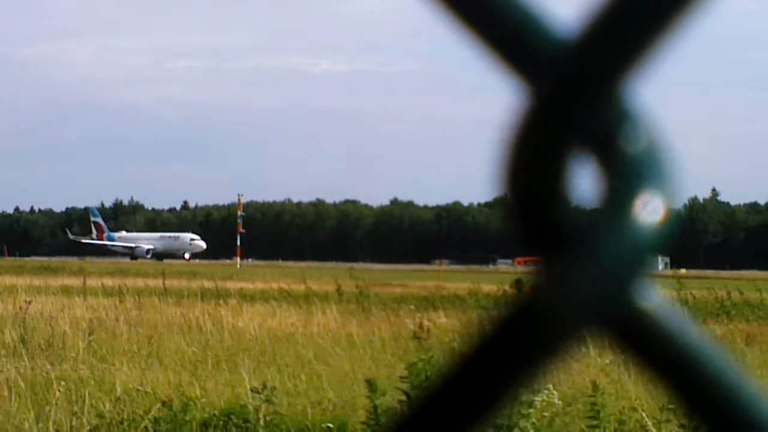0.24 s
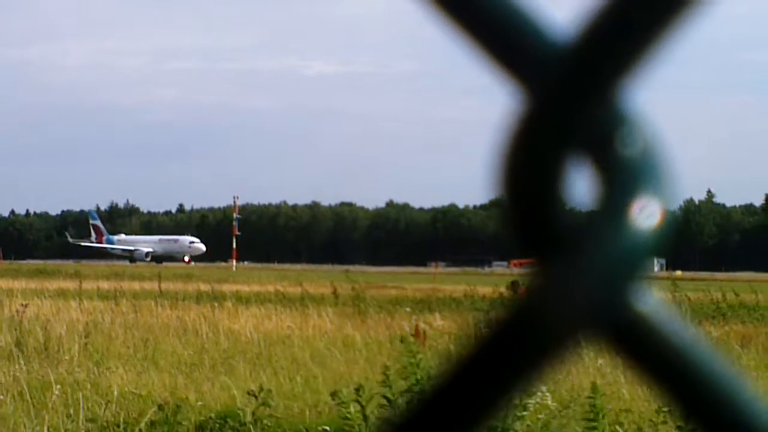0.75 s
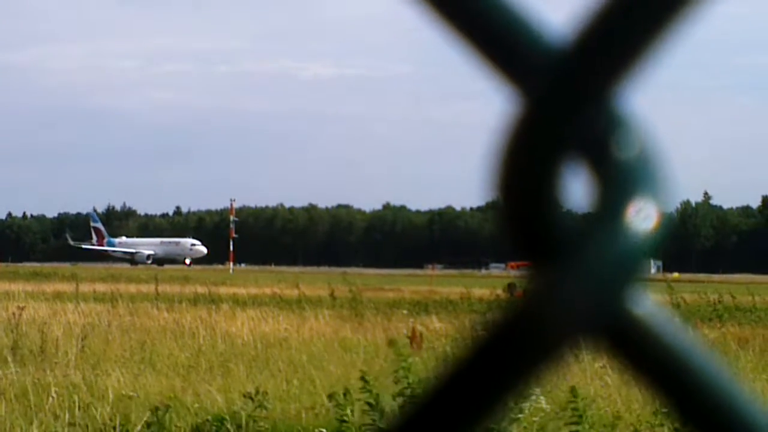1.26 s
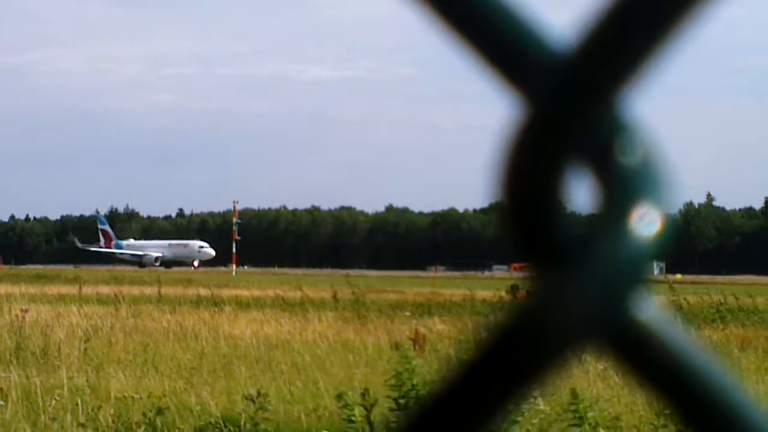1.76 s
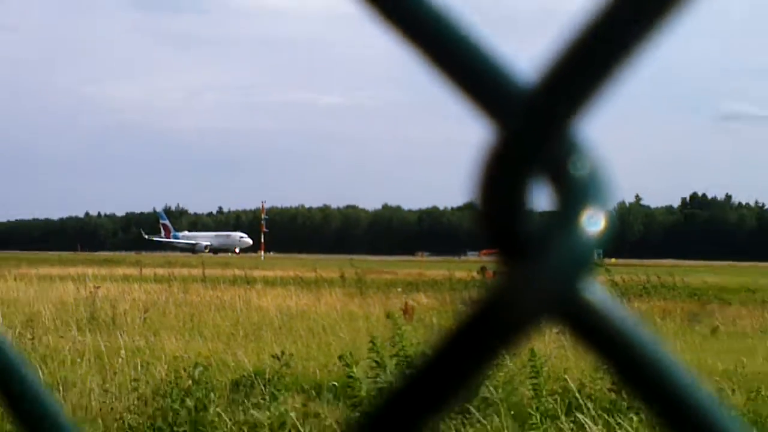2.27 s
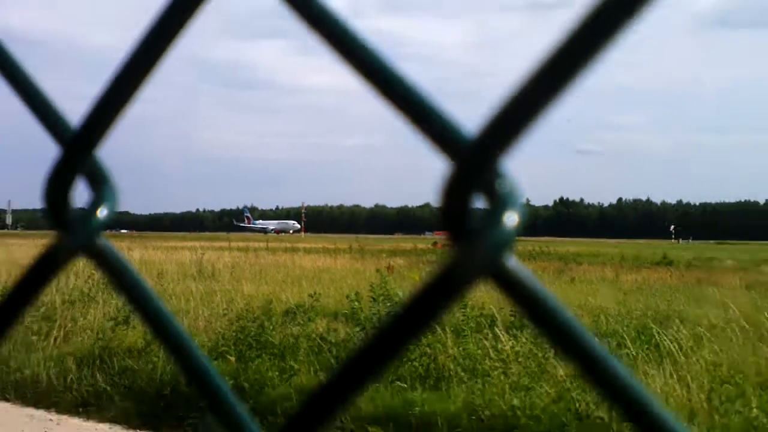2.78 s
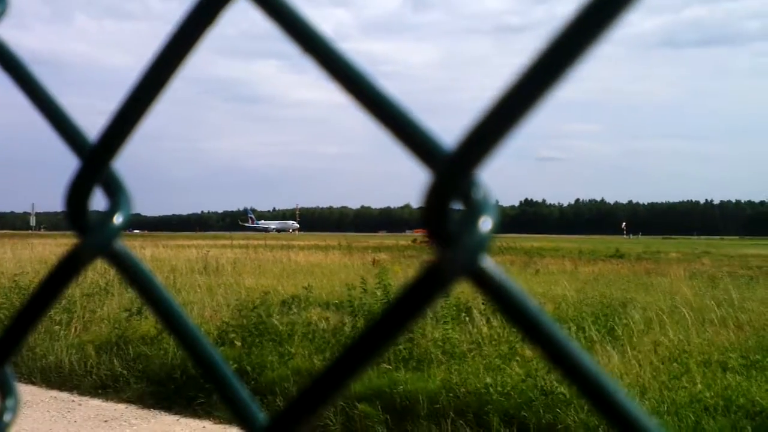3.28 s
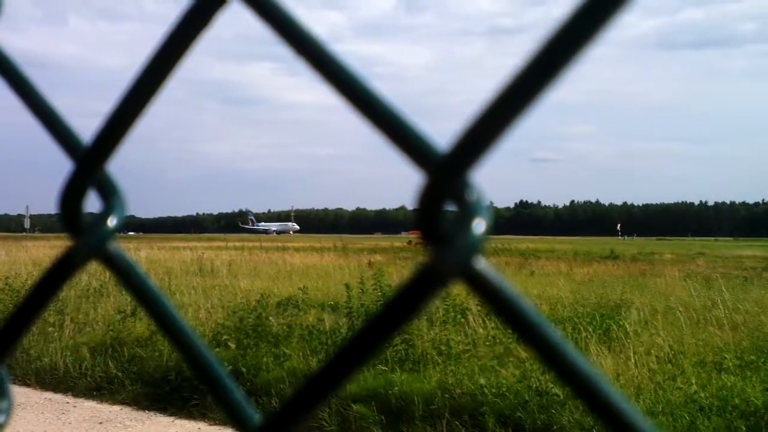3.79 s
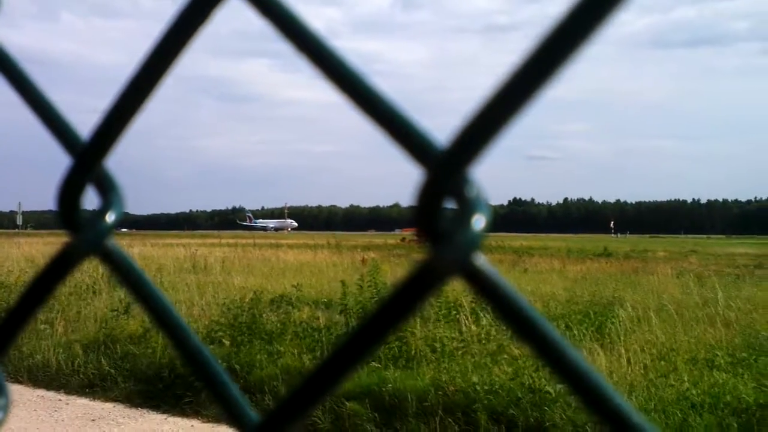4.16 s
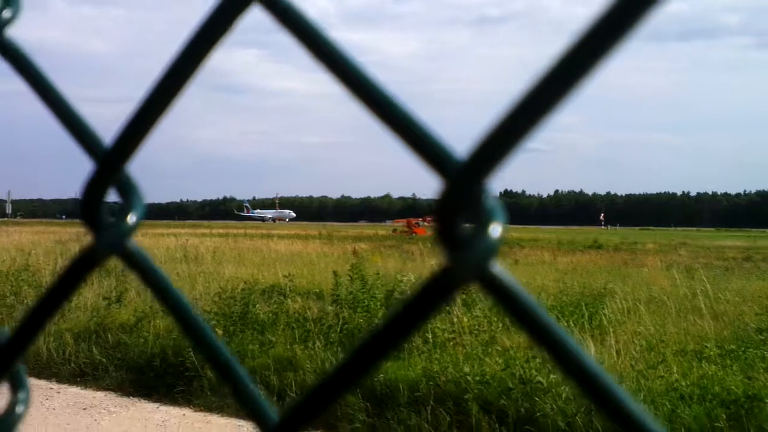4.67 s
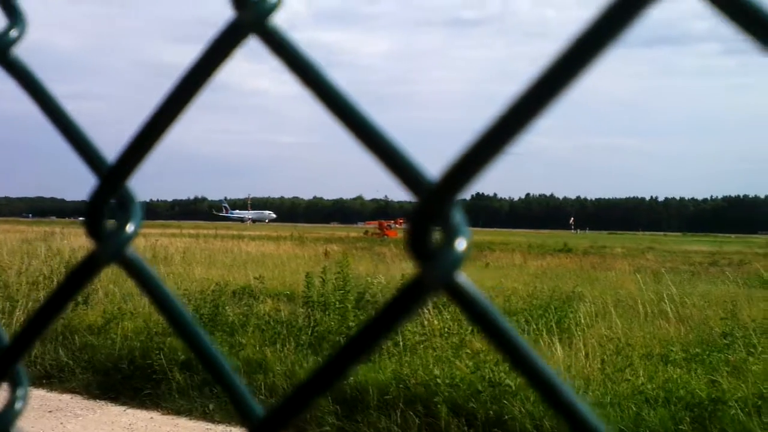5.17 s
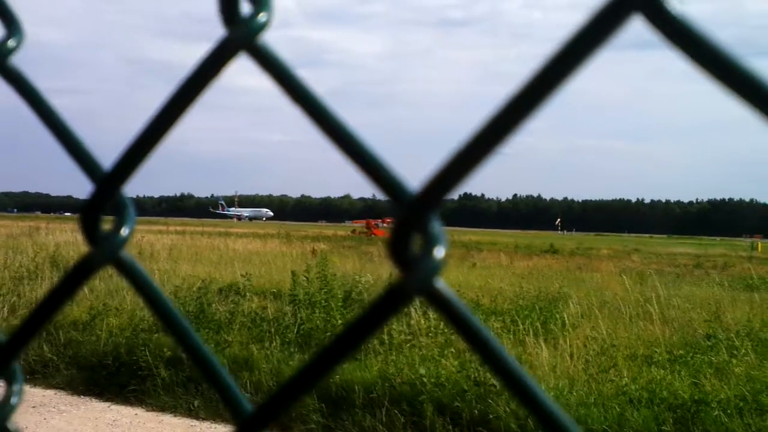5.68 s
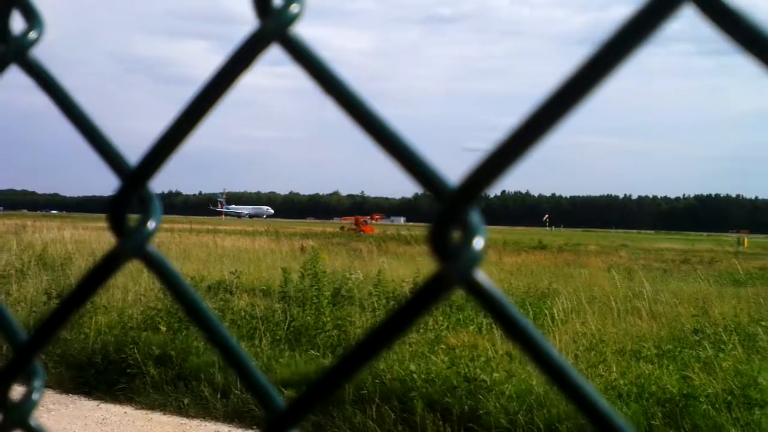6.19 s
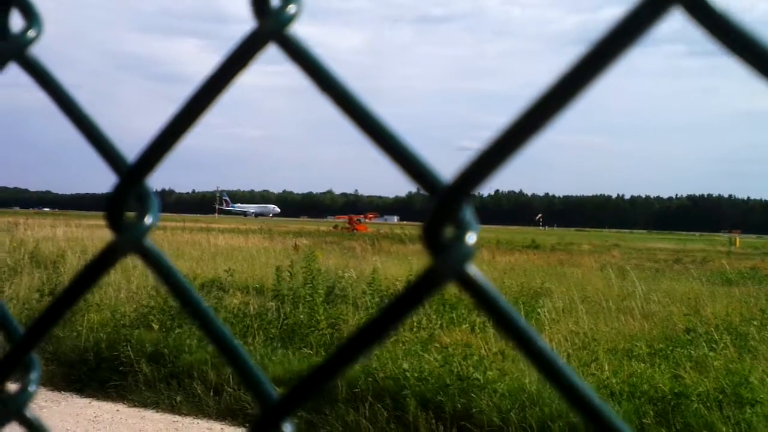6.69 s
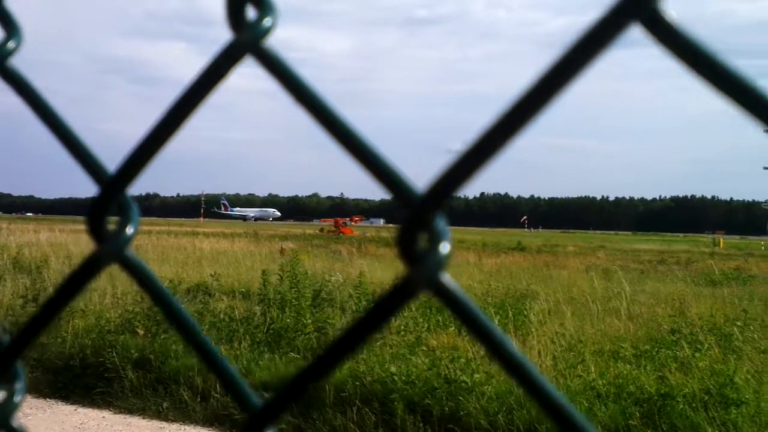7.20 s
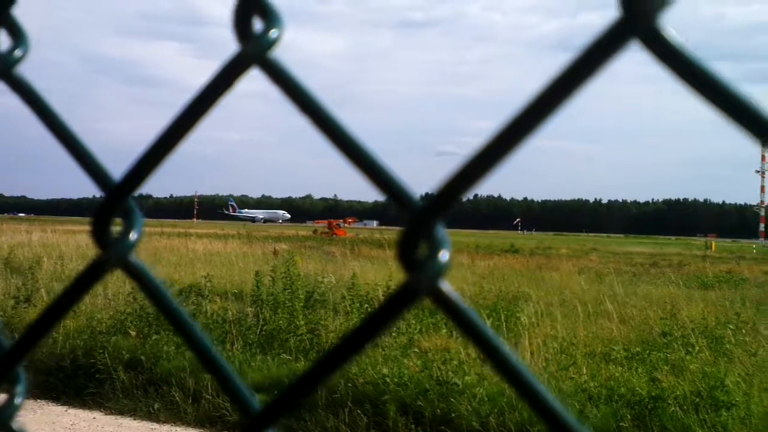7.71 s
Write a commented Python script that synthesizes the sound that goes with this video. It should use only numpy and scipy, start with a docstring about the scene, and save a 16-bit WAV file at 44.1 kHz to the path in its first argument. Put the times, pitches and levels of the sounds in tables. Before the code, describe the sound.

Far-off twin jet engines rise from quiet whine to full take-off thrust, buzzing and roaring, while wind bumps the microphone and an insect scratches softly.

```python
"""Across a broad meadow a distant twin-jet airliner spools up to take-off thrust, heard at two microphone ports.
Harmonics of the rising blade-passing rate sound over band-filtered jet noise; supersonic blade tips add a
buzz of shaft orders, and random gains and scattered paths stand for turbulent air. Wind knocks, mostly on
the right port, are short oscillating pulses with noisy wakes. A close bush-cricket starts after a few
seconds: noise strokes ring the resonances of its wing. Faint treble rustle and steady hiss lie beneath."""
import sys
import numpy as np
from scipy import signal
from scipy.fft import rfft, irfft, next_fast_len
from scipy.io import wavfile
from scipy.ndimage import uniform_filter1d, minimum_filter1d

SR = 44100
rng = np.random.default_rng(int(sys.argv[2]) if len(sys.argv) > 2 else 0)


def digitize_waveform(pressure):
    """Quantize a signal to 16-bit integers and store it at the path in sys.argv[1].

    Rows of a 2-D input are taken as channels; values are limited to [-1, 1].
    """
    field = np.atleast_2d(pressure).T
    bounded = np.clip(field, -1, 1)
    quanta = np.round(bounded * 32767).astype(np.int16)
    wavfile.write(sys.argv[1], SR, quanta)


N = 350532
T = np.arange(N) / SR
HZ = np.fft.rfftfreq(next_fast_len(N), 1 / SR) + 1e-3  # filter axis, kept off zero

# Levels are nominal source levels, ahead of random fluctuation, panning and the bass cut.
# Fan speed as heard: (time [s], mean blade-passing rate of the two fans [Hz])
FAN_SPEED = [(0, 1030), (.4, 1150), (.8, 1300), (1.06, 1445), (1.33, 1550), (1.6, 1578), (1.85, 1590),
             (2.4, 1585), (2.65, 1625), (2.92, 1718), (3.18, 1848), (3.45, 2017), (3.98, 2315),
             (4.24, 2433), (4.5, 2538), (4.77, 2626), (5.04, 2667), (5.3, 2689), (5.83, 2706), (7.42, 2731),
             (7.95, 2732)]
# Blade tone level, swelling and fading, with late dips like slow beats: (time [s], level [dB])
BLADE_TONE_LEVEL = [(0.05, -52.5), (0.4, -57.5), (0.61, -50.5), (0.66, -56.0), (1.2, -40.0), (1.5, -41.0),
                    (1.63, -47.0), (1.69, -39.0), (1.73, -43.0), (1.85, -34.0), (1.9, -44.0), (2.08, -37.0),
                    (2.14, -42.0), (2.32, -38.0), (2.38, -47.0), (2.44, -38.0), (2.54, -46.5),
                    (2.63, -37.5), (2.71, -48.0), (3.0, -47.5), (3.47, -42.0), (3.6, -30.5), (4.01, -30.5),
                    (4.14, -23.5), (4.36, -22.5), (4.46, -26.5), (4.52, -20.0), (4.6, -24.0), (4.69, -15.5),
                    (4.8, -16.5), (5.03, -22.0), (5.07, -14.0), (5.15, -16.5), (5.19, -22.0), (5.24, -14.5),
                    (5.32, -21.0), (5.46, -14.0), (5.52, -24.0), (5.6, -16.5), (5.63, -22.0), (5.71, -17.5),
                    (5.77, -23.0), (5.79, -18.5), (5.85, -21.5), (5.88, -15.5), (5.93, -22.5),
                    (6.05, -27.5), (6.29, -21.5), (6.33, -26.0), (6.37, -17.0), (6.42, -22.0), (6.5, -13.5),
                    (6.54, -21.5), (6.56, -19.5), (6.6, -27.5), (6.62, -18.5), (6.64, -16.5), (6.68, -24.5),
                    (6.81, -28.0), (6.85, -21.5), (6.88, -25.5), (6.99, -20.0), (7.02, -27.0),
                    (7.05, -32.0), (7.09, -22.5), (7.19, -22.0), (7.22, -28.0), (7.27, -20.0), (7.3, -29.5),
                    (7.34, -20.5), (7.36, -27.5), (7.4, -22.5), (7.48, -30.0), (7.56, -23.5), (7.64, -26.0),
                    (7.7, -20.5), (7.75, -28.0), (7.84, -24.0), (7.9, -32.5), (7.95, -26.0)]
# Second blade harmonic: (time [s], level against the roar [dB])
SECOND_HARMONIC = [(0, -13), (.35, -11), (.7, -11), (.82, -2.5), (1.0, -5.5), (1.3, -3), (1.5, 1.5),
                   (1.65, -3), (1.85, -0.5), (1.97, -1), (2.1, 0.5), (2.25, 7.5), (2.35, -5), (2.43, 4),
                   (2.52, -4), (2.6, 1.5), (2.75, -6), (3.05, -6), (3.2, 1), (3.35, -10), (3.64, 0.5),
                   (4.0, -12), (4.3, -15), (4.75, -23.5), (5.0, -24), (5.6, -29), (7.95, -27.5)]
# Third blade harmonic, lost in the air as it climbs: (blade-passing rate [Hz], level [dB])
THIRD_HARMONIC = [(1030, -52), (1300, -54.5), (1600, -56), (1750, -56), (2150, -52), (2430, -61),
                  (2550, -79)]
# Buzz-saw shocks at the blade tips: (shaft order [-], level against the roar [dB])
BUZZ_ORDERS = [(9, -32), (11, -31.5), (12, -32), (14, -22), (15, -22), (16, -20.5), (17, -20), (18, -35),
               (20, -17), (21, -24.5), (22, -20), (23, -27), (27, -27.5), (28, -20.5), (29, -29),
               (30, -19.5), (31, -26.5), (32, -23.5), (33, -21.5), (34, -23.5), (35, -25.5), (37, -16.5),
               (39, -21), (40, -20.5), (41, -16), (42, -22), (44, -22), (45, -32.5), (47, -21)]
# Strength added to all the buzz-saw orders above: (time [s], level [dB])
BUZZ_STRENGTH = [(4, -5.5), (4.5, -3), (5.4, -1.5), (7.2, 3), (7.95, 3)]
# Higher of the two shaft orders that stand out of the buzz: (time [s], level [dB])
UPPER_ORDER_LEVEL = [(4.35, -41), (4.46, -55), (4.56, -34), (4.95, -43.5), (5.22, -32), (5.4, -50),
                     (5.52, -37), (5.75, -47), (6.07, -37), (6.69, -28.5), (6.8, -41), (7.03, -33.5),
                     (7.18, -48), (7.28, -27), (7.5, -33), (7.76, -42), (7.9, -32)]
# Lower of these two shaft orders: (time [s], level [dB])
LOWER_ORDER_LEVEL = [(4.35, -48), (4.47, -51), (4.89, -34.5), (5.95, -34), (6.04, -35), (6.15, -24),
                     (6.31, -43), (6.51, -33), (7.01, -42), (7.49, -35), (7.71, -49), (7.9, -41)]
# Compressor stages on the fan shaft, before air absorption:
# (blade count over the fan's [-], level against the roar [dB])
COMPRESSOR_STAGES = [(3.55, -22), (3.88, -21)]
# Jet roar: (time [s], level [dB])
ROAR_LEVEL = [(0, -47), (.6, -45), (1.1, -42), (1.5, -41.5), (2.25, -39.5), (2.9, -39.5), (3.3, -35),
              (3.8, -29), (4.25, -24), (4.7, -19.5), (5.0, -19), (5.15, -18), (5.35, -17), (5.47, -19),
              (5.6, -18.5), (5.9, -20.5), (6.15, -18.5), (6.35, -19), (6.5, -16), (6.6, -19.5), (6.68, -18),
              (6.77, -21.5), (6.86, -19), (6.94, -24), (6.99, -20), (7.05, -25), (7.15, -24), (7.5, -23),
              (7.68, -22.5), (7.78, -25), (7.95, -23)]
# Relative roar spectrum, with the ground-bounce dip near 1.9 kHz:
# (frequency [Hz], density at idle [dB per Hz], density at full thrust [dB per Hz])
ROAR_SPECTRUM = [(100, 5, -27.5), (272, -19, -41.5), (516, -9.5, -26), (692, -8, -21), (1300, -5.5, -13.5),
                 (1683, -9, -13), (1990, -10, -17.5), (2426, -8, -8.5), (3030, -2.5, -6), (3640, -5.5, -9),
                 (4690, -12, -20), (6566, -20, -31), (8230, -42, -52.5), (12000, -46, -57)]
# Roar colour as the jet rolls: (time [s], treble above 3 kHz [dB], rumble towards the bass [dB])
ROAR_TILT = [(0, -3.5, 1), (1.1, 2, 0.5), (2.2, 0, -4.5), (2.8, 0.5, 0), (3.7, 5, -1), (4.3, 1, -2.5),
             (5.2, 0.5, -3), (5.8, -2, 3), (6.5, 0, 0), (7.1, 0, 6.5), (7.95, -1.5, 7.5)]
# Roar at the two ports: (frequency [Hz], likeness [0-1], left minus right [dB])
PORT_LIKENESS = [(100, 0.07, -2.5), (250, 0.92, 1), (820, 0.76, 1.5), (1700, 0.06, 2), (3140, 0.36, -1),
                 (4300, .45, -3), (6000, 0.22, -7.5), (9700, 0.1, 5.5)]
# Balance of the whole jet: (time [s], left minus right [dB])
JET_BALANCE = [(0, -2), (1.8, -3), (3.4, -3), (7.95, -.5)]
# Wind knocks: (time of the peak [s], peak level [dB], pitch [Hz], length at half height [ms])
WIND_KNOCKS = [(0.193, -38, 580.0, 2.2), (0.198, -22.5, 467, 1.5), (0.213, -27, 490.0, 1.3),
               (0.49, -37.0, 470.0, 2.5), (0.849, -29.5, 480.0, 4.9), (0.95, -40, 500.0, 5.3),
               (1.023, -37, 530.0, 2.6), (1.042, -29, 480.0, 2.8), (1.048, -37, 530.0, 1.9),
               (1.055, -29, 520.0, 2.1), (1.06, -27, 643, 2.5), (1.072, -36, 520.0, 2.9),
               (1.115, -29, 430.0, 2.6), (1.118, -23, 390.0, 2.5), (1.129, -22.5, 440.0, 2.8),
               (1.141, -33, 440.0, 2.2), (1.163, -32, 416, 3.6), (1.267, -31, 490, 1.7),
               (1.355, -24.5, 555, 2.5), (1.486, -30.5, 470.0, 2), (1.513, -21.5, 460, 3.5),
               (1.524, -31, 490.0, 1.9), (1.531, -24, 570.0, 1.7), (1.564, -19, 520.0, 1.9),
               (1.569, -18.5, 425, 3.9), (1.574, -12.5, 435, 0.88), (1.58, -27, 330.0, 1.8),
               (1.634, -31, 420.0, 3.2), (1.65, -28, 390.0, 2.4), (1.662, -21.5, 393, 2.1),
               (1.717, -33.0, 560.0, 1.7), (1.732, -28.5, 520.0, 2.8), (1.739, -37, 460.0, 2.1),
               (1.774, -31, 540.0, 2.3), (1.8, -37, 474, 7.1), (1.913, -34, 560.0, 2.1),
               (2.309, -37, 580.0, 2), (2.481, -31, 440.0, 2.4), (2.516, -22, 566, 2.8),
               (2.52, -27, 420.0, 1.7), (2.53, -29, 470.0, 2), (2.549, -35.0, 440.0, 2.8),
               (2.554, -21, 534, 3.4), (2.606, -27, 474, 2.8), (2.802, -39, 400, 2.8),
               (2.813, -36, 487, 1.7), (2.929, -39.0, 450, 2), (2.973, -37.0, 450, 2),
               (3.171, -36, 550.0, 3), (3.355, -36, 490.0, 2.3), (5.241, -19, 390, 2.4),
               (5.32, -20, 710.0, 1.8), (5.49, -18, 510.0, 3), (5.591, -20, 464, 5.2),
               (5.629, -19, 550.0, 2.2), (5.638, -18, 610.0, 2.3), (5.872, -16.5, 535, 2.5),
               (5.902, -15.5, 520, 2.6), (5.908, -13, 510, 3.1), (5.916, -15, 570.0, 2.2),
               (6.211, -19, 640, 2.0), (6.216, -20, 543, 3.6), (6.234, -14, 600, 3.7),
               (6.239, -9, 660, 2.7), (6.322, -17, 545, 2.5), (6.331, -21, 430, 3.9),
               (6.365, -15.5, 490, 2.4), (6.374, -20, 480.0, 2.1), (6.78, -20, 398, 2.1),
               (7.04, -24, 400, 2.7)]
# Wind buffeting between the knocks: (time [s], median level [dB])
BUFFETING = [(0, -85), (.38, -60), (.55, -68), (.95, -57), (1.2, -57), (1.38, -63.5), (1.72, -55.5),
             (2.0, -70), (2.3, -70), (2.9, -69), (3.5, -68), (4.7, -70.5), (5.6, -57), (6.0, -63.5),
             (7.0, -57), (7.4, -74), (7.95, -70)]
# Bush-cricket wing: (time [s], cycles so far [-])
WING_CYCLES = [(2.757, 0), (3.124, 8), (3.877, 24), (5.359, 56), (5.732, 64), (6.113, 72), (7.14, 94),
               (7.608, 104), (7.895, 110)]
# Bush-cricket: (time [s], level [dB], left minus right [dB], blur of the strokes [0-1])
CRICKET_LEVEL = [(2.74, -54, 2, 0.1), (2.82, -49.5, 0.5, 0.23), (3.4, -55.5, 2, 0.4), (3.6, -60, -2, 0.7),
                 (4.2, -53.5, -2, 0.4), (4.9, -54.5, -2, 0.46), (5.1, -55, -0.5, 0.5), (5.4, -53.5, 1, 0.7),
                 (5.55, -58.5, 0.5, 0.5), (5.75, -60.5, 3, 0.6), (6.25, -61.5, 2, 0.8), (6.5, -50, 0, 0.36),
                 (6.9, -60, 4, 0.58), (7.25, -46, 1, 0.26), (7.7, -53.5, 1, 0.44), (7.95, -66, 1, 0.5)]
# Resonances of the wing: (frequency [Hz], width [Hz], level [dB])
WING_MODES = [(9460, 500, -4), (10030, 720, 3.5), (10600, 800, -3), (11270, 430, -6.5), (12200, 500, -10),
              (13000, 1200, -19), (14900, 900, -28)]
# Extra level of the wing resonance near 11.3 kHz: (time [s], level [dB])
UPPER_WING_LEVEL = [(2.7, 6), (3.6, 6.5), (4.2, 1), (5.2, 2), (6, -1.5), (7.95, -1)]
# Faint rustle in the treble: (time [s], level [dB])
RUSTLE_LEVEL = [(0, -83), (.9, -75), (1.25, -67), (1.55, -72), (1.7, -76), (7.95, -80)]

BLADES = 36
IDLE_HZ, FULL_HZ = 1030, 2430  # blade rates at idle and at full thrust
SONIC_HZ, SONIC_SPAN_HZ = 2260, 140  # blade rate where the tips turn supersonic; span of the buzz's onset
LOUD_ORDERS = 24, 19  # shaft orders that stand out of the buzz
# The two engines spool up apart and draw together between these times.
MATCH_S, MATCHED_S = 4.2, 5.5
GAP_HZ, MATCHED_GAP_HZ = 31, 6  # gap between their blade rates
STEADY_APART, STEADY_MATCHED = 0.19, 0.83  # unscattered share of power in the fundamental
# Far engine's blade tone against the near one: about equal at first, much weaker once matched.
FAR_APART_DB, FAR_MATCHED_DB = 0.5, -13.5
HUMP_DB, HUMP_MATCHED_DB = -6, -11  # broad hump round each harmonic, against the near tone
AIR_HZ = 6500  # above this the long path through air absorbs the compressor tones
EDDY_DB = 0.65  # large eddies shake tones and roar together

KNOCK_PAN_DB, KNOCK_PAN_SCATTER_DB = -14.5, 6  # left minus right: the right port faces the wind
KNOCK_RISE = 0.86  # rise time over fall time
KNOCK_SAG = 0.71  # share by which the pitch falls over the knock's length
THUD_DB, THUD_MS = -6, 1.95  # dull push and pull of air under a knock of -25.5 dB
THUD_SLOPE = -0.35  # change of the thud's relative level per dB of knock level
KNOCK_TAIL, KNOCK_TAIL_S = 0.26, 0.0086  # wake's share of the peak, and decay time
CRACK_DB, CRACK_MS = -11, 1.5  # sharp crackle on the front of each knock
ECHO_HZ = 11900  # the cricket's echoes lose the top of the scrape
WING_WANDER_DB, WING_TURN = 2.0, 1.8  # each mode's own swell; spread of its phase at the right port [rad]
HISS_DB = -62.5
BASS_CUT_HZ, BASS_LEAK_DB, TOP_HZ = 257, -40, 15700


def undb(db):
    """Level: 20 dB is a tenfold amplitude."""
    return 10 ** (np.asarray(db) / 20)


def curves(table):
    """Linear interpolation: columns of a time table, one value a sample."""
    s, *columns = np.transpose(table)
    return [np.interp(T, s, c) for c in columns]


def at_hz(table, hz):
    """Logarithmic pitch: columns of a frequency table, straight on a log axis."""
    f, *columns = np.transpose(table)
    return [np.interp(np.log(hz), np.log(f), c) for c in columns]


def shaped(x, gain):
    """Linear filtering: multiply the spectrum by a gain given on HZ."""
    return irfft(rfft(x, next_fast_len(N)) * gain, next_fast_len(N))[..., :N]


def unit(x):
    """Normalization to unit root-mean-square amplitude."""
    return x / np.sqrt(np.mean(np.abs(x) ** 2))


def walk(rate):
    """Random modulation: levels held 1 / rate s and smoothed twice, with unit spread."""
    k = int(SR / rate)
    held = np.repeat(rng.standard_normal(N // k + 1), k)
    return unit(uniform_filter1d(uniform_filter1d(held, k), k)[:N])


def pair(a, b, alike):
    """Coherence: left and right from two unrelated signals with the given likeness."""
    alike = np.clip(alike, 0, 1)
    return np.sqrt((1 + alike) / 2) * a + np.sqrt((1 - alike) / 2) * b * np.array([[1], [-1]])


def panned(x, pan_db):
    """Level difference: half added at the left, half taken at the right."""
    return x * undb(np.outer([1, -1], pan_db) / 2)


def bell(ms_from_peak, length_ms):
    """Gaussian envelope of the given length at half height."""
    return np.exp(-np.log(16) * (ms_from_peak / length_ms) ** 2)


def band_noise(noise, order, low_hz, high_hz):
    """Band-pass filtering: noise between two corners, at unit amplitude."""
    sos = signal.butter(order, [low_hz, high_hz], "band", fs=SR, output="sos")
    return unit(signal.sosfilt(sos, noise))


def tone(turns, steady, rate, alike):
    """Multipath fading: a sine on one straight path and many scattered ones fades and wavers."""
    steady = np.clip(steady, 0, 1)
    common, own = (walk(rate) + 1j * walk(rate) for _ in range(2))
    paths = np.sqrt(steady) + np.sqrt((1 - steady) / 2) * pair(common, own, alike)
    return np.sqrt(2) * np.real(paths * np.exp(2j * np.pi * turns))


def as_engines_match(apart, matched):
    """Synchronization: a value that glides while the two engines draw together."""
    return np.interp(T, [MATCH_S, MATCHED_S], [apart, matched])


def blade_tones(hz, shafts, roar_db):
    """Blade passing and beating: two nearly equal fans sound harmonics, each in a turbulence hump."""
    steady = as_engines_match(STEADY_APART, STEADY_MATCHED)
    far_db = as_engines_match(FAR_APART_DB, FAR_MATCHED_DB)
    hump_db = as_engines_match(HUMP_DB, HUMP_MATCHED_DB)
    third_db, = at_hz(THIRD_HARMONIC, hz)
    levels = [curves(BLADE_TONE_LEVEL)[0], roar_db + curves(SECOND_HARMONIC)[0], third_db]
    total_amplitude = np.sqrt(1 + undb(2 * far_db) + undb(2 * hump_db))
    out = 0
    for harmonic, db in enumerate(levels, start=1):
        order = harmonic * BLADES
        near, far = (tone(order * shaft, steady=steady / harmonic, rate=60 * harmonic, alike=0.46)
                     for shaft in shafts)
        # turbulence swallowed by the fan broadens the line
        hump = tone(order * shafts[0], steady=0, rate=350, alike=0.49)
        mixture = near + undb(far_db) * far + undb(hump_db) * hump
        out = out + undb(db + 1.73 * walk(45)) * mixture / total_amplitude
    return out


def shaft_buzz(hz, shaft, roar_db):
    """Shock radiation: supersonic blade tips sound multiples of the shaft rate."""
    sonic = np.clip((hz - SONIC_HZ) / SONIC_SPAN_HZ, 0, 1)
    buzz = sum(undb(db + 2.0 * walk(6)) * tone(order * shaft, steady=0.13, rate=26, alike=0.32)
               for order, db in BUZZ_ORDERS)
    out = undb(roar_db + curves(BUZZ_STRENGTH)[0]) * buzz
    for order, level in zip(LOUD_ORDERS, (UPPER_ORDER_LEVEL, LOWER_ORDER_LEVEL)):
        out = out + undb(curves(level)[0]) * tone(order * shaft, steady=0.68, rate=25, alike=0.22)
    return sonic * out


def compressor(shaft, roar_db):
    """Blade passing with air absorption: stage tones keep their ratio to the fan and lose their top."""
    stages = sum(undb(db) * tone(ratio * BLADES * shaft, steady=.02, rate=140, alike=0.65)
                 for ratio, db in COMPRESSOR_STAGES)
    return shaped(undb(roar_db + 1.5 * walk(12)) * stages, 1 / (1 + (HZ / AIR_HZ) ** 16))


def roar(thrust, level_db, treble_db, rumble_db):
    """Turbulent mixing noise: quarter-octave bands twinkle in moving air, together and alone."""
    noise = rfft(rng.standard_normal((2, next_fast_len(N))))
    out, power = 0, 0
    shared, patch = walk(30) + 0.13 * walk(13.0), walk(17)
    for hz in 90 * 2 ** (np.arange(29) / 4):
        skirt = np.cos(np.pi / 2 * np.clip(4 * np.log2(HZ / hz), -1, 1)) ** 2
        band = irfft(noise * skirt, next_fast_len(N))[:, :N]
        idle_db, full_db = at_hz(ROAR_SPECTRUM, hz)
        alike, pan_db = at_hz(PORT_LIKENESS, hz)
        patch = 0.866 * patch + 0.32 * walk(16)  # neighbouring bands pass through the same eddies
        treble_share = np.clip(np.log2(hz / 3000), 0, 1)
        rumble_share = np.clip(np.log2(1300 / hz), 0, 1)
        tilt_db = treble_db * treble_share + rumble_db * rumble_share
        gain = undb(idle_db + thrust * (full_db - idle_db) + tilt_db)
        power = power + gain ** 2 * hz  # bandwidth grows with frequency
        twinkle = undb(0.7 * shared + 0.6 * patch + 0.74 * walk(25))
        out = out + gain * twinkle * panned(pair(*band, alike), pan_db)
    return unit(out / np.sqrt(power)) * undb(level_db)


def jet():
    """Superposition: fan, shock, compressor and roar add, and large eddies shake them together."""
    roar_db, = curves(ROAR_LEVEL)
    hz = uniform_filter1d(curves(FAN_SPEED)[0], SR // 5)
    gap = as_engines_match(GAP_HZ, MATCHED_GAP_HZ)
    shafts = [np.cumsum(hz + side * gap / 2) / BLADES / SR for side in (-1, 1)]  # turns: near, far
    thrust = np.clip((hz - IDLE_HZ) / (FULL_HZ - IDLE_HZ), 0, 1)
    tones = blade_tones(hz, shafts, roar_db) + shaft_buzz(hz, shafts[0], roar_db)
    tones = tones + compressor(shafts[0], roar_db)
    engines = tones + roar(thrust, roar_db, *curves(ROAR_TILT))
    return panned(engines, *curves(JET_BALANCE)) * undb(EDDY_DB * walk(28))


def wind_knocks():
    """Aerodynamic pressure pulses: eddies strike the ports as falling blips with a ragged wake."""
    out, t = np.zeros((2, N)), np.arange(-512, 2048) / SR
    draws = rng.standard_normal((len(WIND_KNOCKS), 2, len(t)))
    for (s, db, hz, ms), noise in zip(WIND_KNOCKS, draws):
        t_ms = 1000 * t
        envelope = bell(t_ms / np.where(t < 0, KNOCK_RISE, 1), ms)
        turns = hz * t * (1 - KNOCK_SAG * t_ms / (2 * ms))
        blip = envelope * np.cos(2 * np.pi * turns + np.pi * noise[1, 0])
        thud = np.sign(noise[1, 1]) * 4 * t_ms / THUD_MS * bell(t_ms, THUD_MS)
        thud = undb(THUD_DB + THUD_SLOPE * (db + 25.5)) * thud
        crack = band_noise(noise[0], 2, 1.2 * hz, 2.43 * hz)
        crack = undb(CRACK_DB) * bell(t_ms + 0.41 * ms, CRACK_MS) * crack
        wake = pair(*band_noise(noise, 3, .5 * hz, 1.33 * hz), 0.8)
        wake = KNOCK_TAIL * np.clip(t / 0.0026, 0, 1) * np.exp(-np.abs(t) / KNOCK_TAIL_S) * wake
        left_db = KNOCK_PAN_DB + KNOCK_PAN_SCATTER_DB * noise[0, 0]
        i = int(s * SR) - 512
        out[:, i:i + len(t)] += undb(db) * undb([[left_db], [0]]) * (blip + thud + crack + wake)
    return out


def wind_patter():
    """Intermittent turbulence: low-passed noise in bounded random bursts buffets the ports."""
    # tanh keeps the small eddies from growing into knocks
    eddies = rng.standard_normal((2, N)) * undb(10.1 * np.tanh(0.76 * walk(70)))
    patter = shaped(pair(*eddies, 0.69), 1 / np.sqrt(1 + (HZ / 520) ** 6))
    return panned(patter / np.median(np.abs(patter)), -3.0) * undb(curves(BUFFETING)[0])


def cricket():
    """Stridulation and resonance: a sharp then a longer scrape each cycle rings the wing, over echoes."""
    level_db, pan_db, blur = curves(CRICKET_LEVEL)
    s, count = np.transpose(WING_CYCLES)
    cycle = np.interp(T, s, count, left=-1) + .25  # negative before the song starts
    which, phase = np.maximum(cycle, 0).astype(int), cycle % 1
    size = undb(2.2 * rng.standard_normal((int(count[-1]) + 2, 2)))[which].T
    sharp = size[0] * np.exp(-((phase - .25) / 0.042) ** 2)
    long = 0.64 * size[1] * np.exp(-((phase - .59) / 0.099) ** 2)
    noise = pair(*rng.standard_normal((2, N)), 0.28) * (cycle >= 0)
    echoes = shaped(noise * blur * undb(4.5 * walk(7.5)), 1 / (1 + (HZ / ECHO_HZ) ** 8))
    source = noise * (sharp + long) + echoes
    scrape = 0
    for k, (hz, width, db) in enumerate(WING_MODES):
        db = db + (k == 3) * curves(UPPER_WING_LEVEL)[0]
        ring = 1 / (1 + (2 * (HZ - hz) / width) ** 2)
        left, right = shaped(source, ring)
        quarter = shaped(source[1], 1j * ring)  # right port a quarter cycle away
        turn = WING_TURN * walk(1.5)  # drifting phase between the ports
        mode = np.array([left, np.cos(turn) * right + np.sin(turn) * quarter])
        scrape = scrape + undb(db + WING_WANDER_DB * walk(14)) * mode
    return panned(unit(scrape), pan_db) * undb(level_db + 1.0 * walk(9))


def rustle():
    """Amplitude modulation: band-limited treble noise swells in short puffs."""
    band = 1 / (1 + (HZ / 11500) ** 8) / (1 + (7500 / HZ) ** 8)
    noise = shaped(pair(*rng.standard_normal((2, N)), 0.37), band)
    return unit(noise) * undb(curves(RUSTLE_LEVEL)[0] + 4.0 * walk(23))


def hiss():
    """Stationary noise: a steady low-passed floor, partly alike at the two ports."""
    noise = pair(*rng.standard_normal((2, N)), .25)
    return undb(HISS_DB) * shaped(noise, 1 / (1 + (HZ / 12000) ** 6))


def scene():
    """Superposition: the pressures of all the sources add."""
    return jet() + wind_knocks() + wind_patter() + cricket() + rustle() + hiss()


def record(dry):
    """Band limiting and peak limiting: bass thinned steeply, highest peaks reduced, top removed."""
    thin = shaped(dry, 1 / np.sqrt(1 + (BASS_CUT_HZ / HZ) ** 9) + undb(BASS_LEAK_DB))
    peak_gain = np.minimum(.9 / (np.abs(thin).max(axis=0) + 1e-9), 1)
    # ducks for a few ms round each peak
    gain = uniform_filter1d(minimum_filter1d(peak_gain, size=400), size=200)
    return signal.sosfilt(signal.ellip(8, .2, 70, TOP_HZ, fs=SR, output="sos"), thin * gain)


dry = scene()
out = record(dry)
digitize_waveform(out)
```